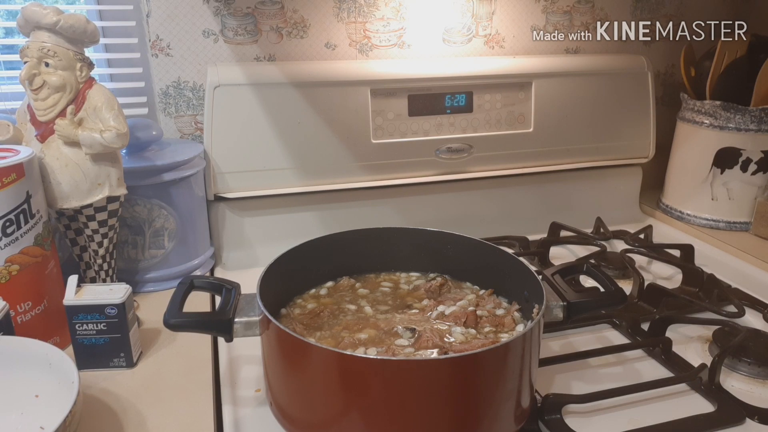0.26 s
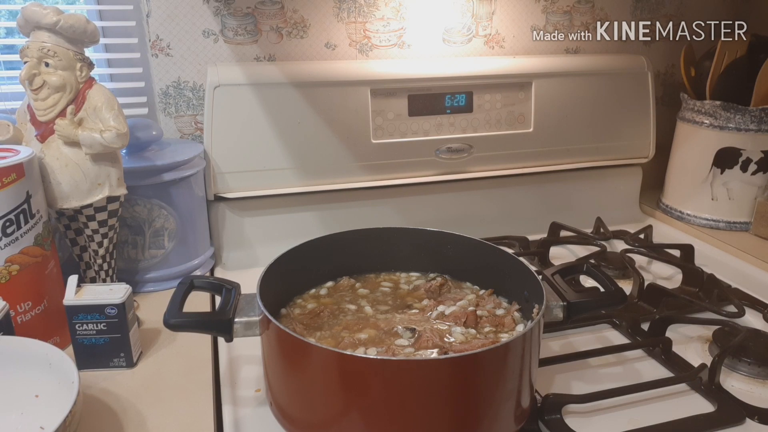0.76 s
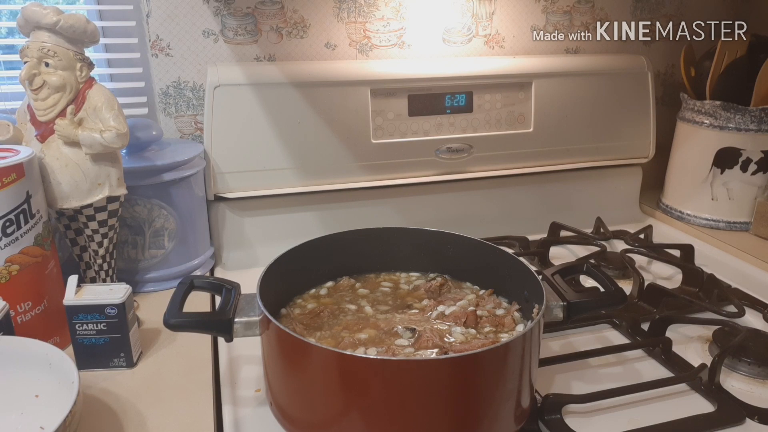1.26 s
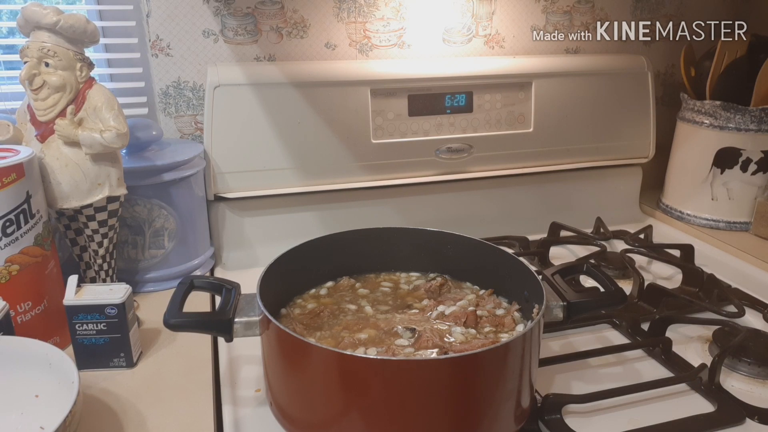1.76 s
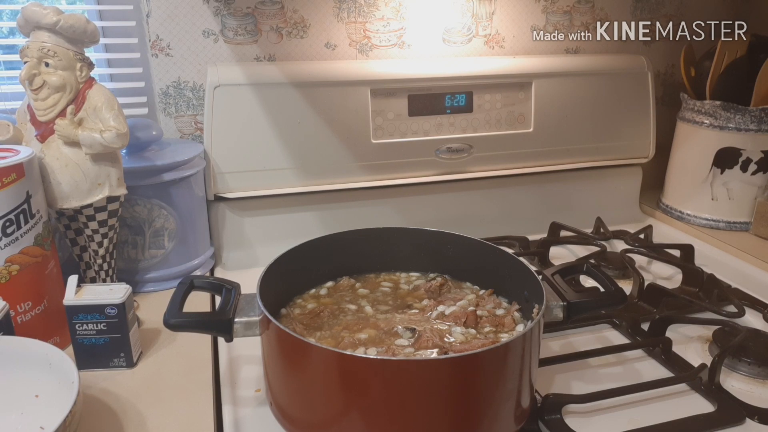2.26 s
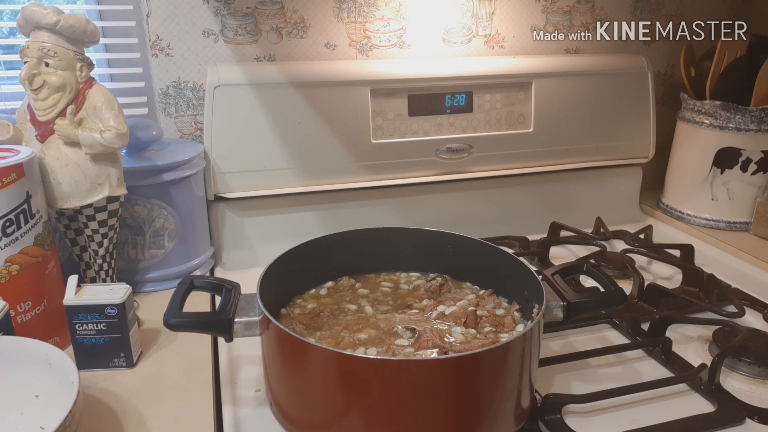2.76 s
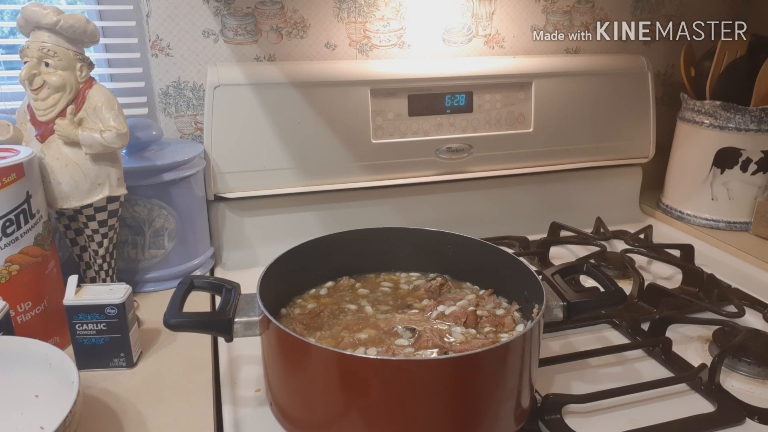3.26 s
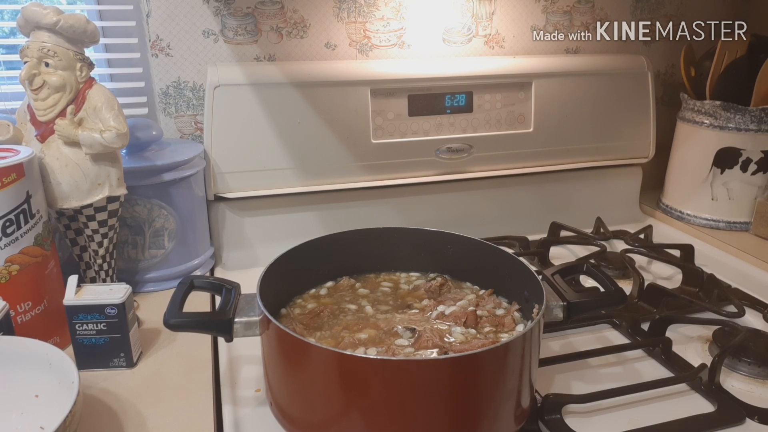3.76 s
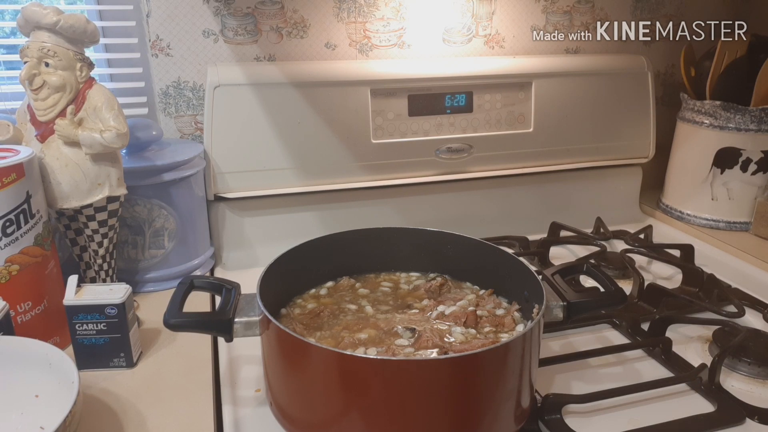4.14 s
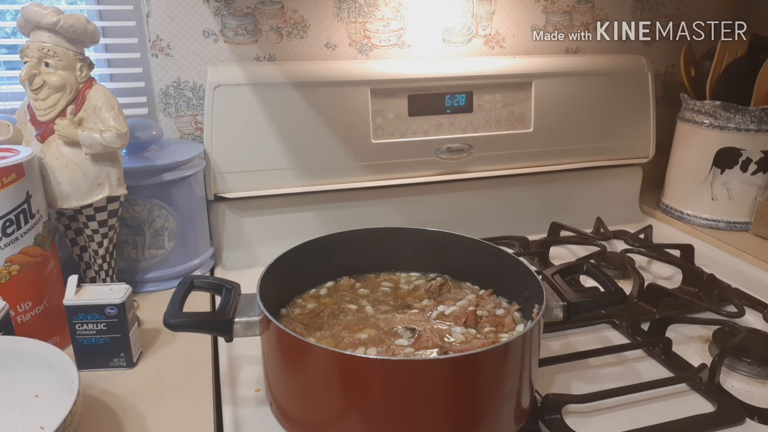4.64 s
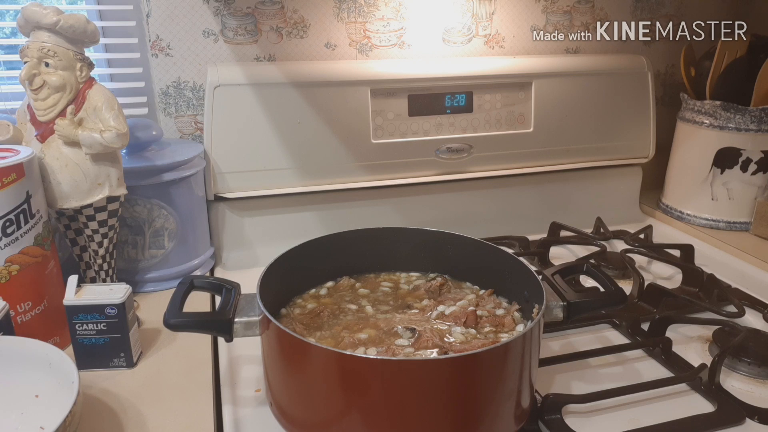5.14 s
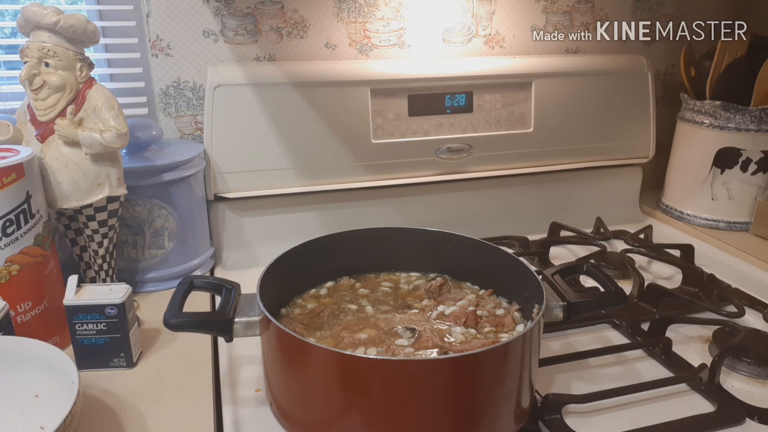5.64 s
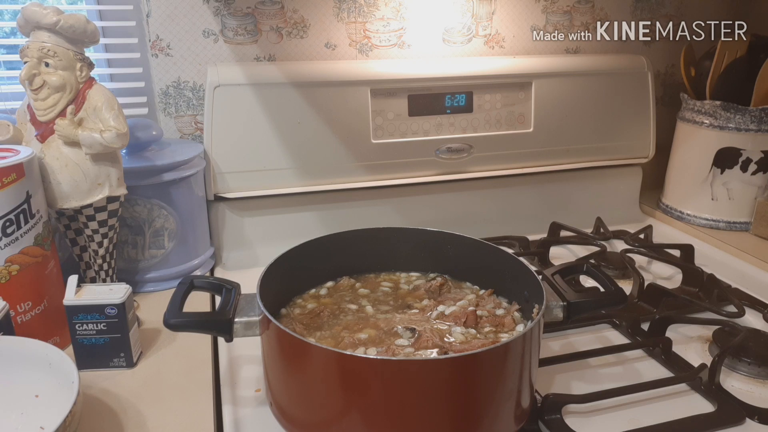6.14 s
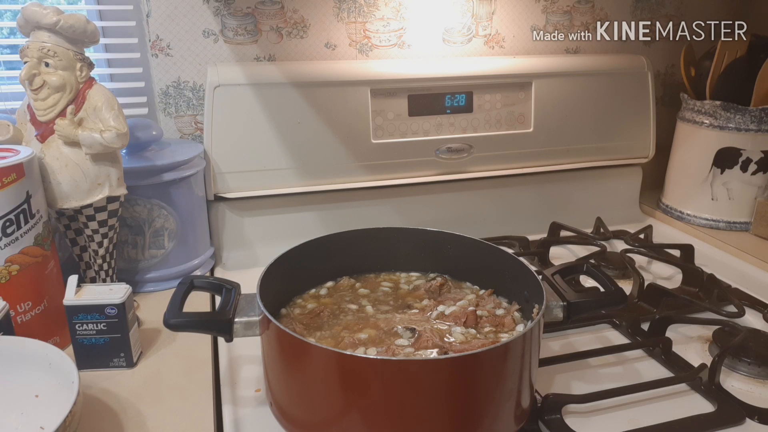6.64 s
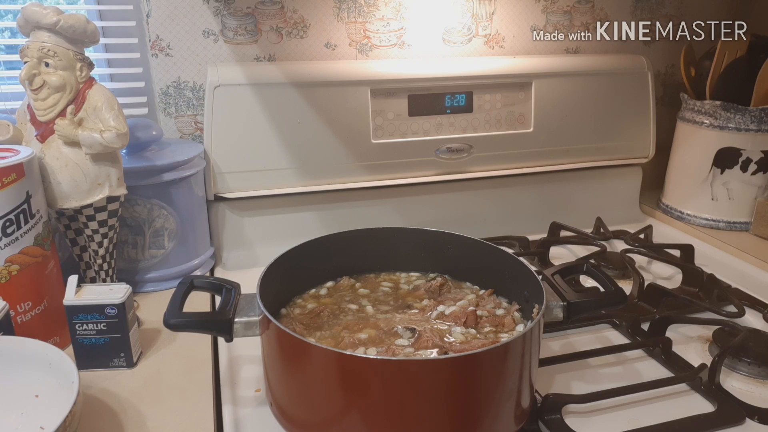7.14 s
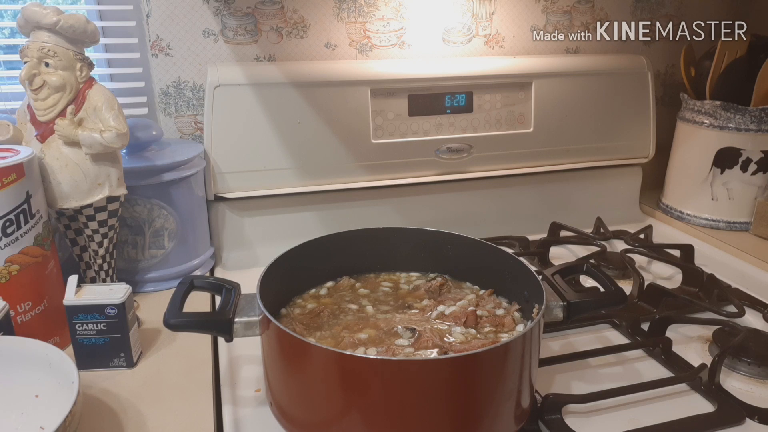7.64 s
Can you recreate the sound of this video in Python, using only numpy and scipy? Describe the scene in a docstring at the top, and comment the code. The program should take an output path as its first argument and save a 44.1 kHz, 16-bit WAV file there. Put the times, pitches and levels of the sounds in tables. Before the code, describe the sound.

A gas burner hisses steadily under a simmering pot while dishes clink lightly and things are set down farther off in a hard-walled kitchen.

```python
"""A hard-walled kitchen: a pot simmers on a gas stove, the burner hissing over the hum of appliances.
Further off someone handles crockery: dishes ring in beating modes, things set down knock the counter.
Slid things drone faintly as narrow-band friction noise; a soft rustle of broad noise comes and goes.
Two microphone ports a hand apart hear the burner and the crockery from the left."""
import sys
import numpy as np
from scipy import signal
from scipy.fft import rfft, irfft, next_fast_len
from scipy.io import wavfile
from scipy.ndimage import uniform_filter1d, map_coordinates

SR = 44100
rng = np.random.default_rng(int(sys.argv[2]) if len(sys.argv) > 2 else 0)


def wav_record(signal):
    """Record a signal, one row per channel, as 16-bit PCM in the file named by sys.argv[1]."""
    frames = np.transpose(np.atleast_2d(signal))
    bounded = np.clip(frames, -1, 1)
    # unit amplitude maps onto the largest positive 16-bit level
    quanta = np.round(bounded * 32767).astype(np.int16)
    wavfile.write(sys.argv[1], SR, quanta)


N = 347720  # length in samples

# Colour of the burner jets. Each row: frequency in Hz, relative density in dB per Hz.
JET_COLOUR = [(1350, -32), (2300, -22), (2970, -10), (3380, -5.5), (3690, -6.5), (3930, -2.5), (4400, -6.5),
              (4770, -3), (7410, -1.5), (8690, -9), (11000, 3.5), (12900, 2.5), (15600, -2.5)]
# Narrow bands that stand out of both hiss and hum. Each row: centre in Hz, width in Hz, lift in dB.
NARROW_BANDS = [(57, 26, 7.5), (100, 10, 2), (275, 14, -1), (510, 64, 6.5), (674, 26, 9.5), (1067, 44, 6.5),
                (1530, 71, 14.5), (2033, 91, 7), (4410, 64, 10), (11600, 350, 0.5)]
# Mode pairs of the dish. Each row: frequency in Hz, level in dB, t60 in s, split of the pair in Hz.
DISH_MODES = [(1858, 0, 0.4, 20), (2915, 7, 0.19, 40), (2815, -5.5, 0.08, 30), (4125, -2.5, 0.1, 40),
              (5560, -3, 0.055, 62)]
# Contacts on the dish. Each row: start in s, level in dB, hardness in dB per octave, lift of the second
# mode in dB, lean to the upper mode of each pair from -1 to 1, time it rings freely until damped in s.
DISH_CLINKS = [(0.6377, -33, 0, -11, 0.56, 0.0081), (0.651, -26.5, -7, -12, 1, 0.031),
               (0.7159, -27, 1.5, -9, 0.23, 0.024), (.733, -44, -3, 4.5, 0.6, .02),
               (0.762, -45.5, 10, -11, 0.88, 0.017), (1.5417, -40, 6.5, 1, -.5, 0.017),
               (1.570, -42, 2, -4, -0.58, 0.048), (4.0277, -33.5, 5.5, -12.5, 0.85, 0.063),
               (4.117, -44.5, -8, -6, 0.89, 0.048), (4.522, -41, 0, 8, -0.034, 0.066),
               (4.685, -47.5, -2, 7.5, 0.53, .025), (4.708, -43, -5, -8, 0.96, 0.045),
               (5.108, -39.5, 9, -12, -0.82, 0.025), (5.131, -52.5, 9, 6.5, 0.45, 0.031),
               (5.177, -39.5, 2, -12, -0.72, 0.039), (5.321, -42.5, 6, 1, 0.79, 0.05),
               (5.393, -45, 0, -12, 0.78, 0.054)]
# A smaller piece with one clear mode pair. Its row: frequency in Hz, level in dB, t60 in s, split in Hz.
CUP_MODES = [(2210, 0, 0.22, 4)]
# Light taps on the cup. Each row: start in s, level in dB, time it rings freely in s.
CUP_CONTACTS = [(.717, -45, .012), (.738, -47, .02), (1.509, -37, 0.039), (1.8994, -41, .035)]
# Things set down. Each row: start in s, level in dB, centre in Hz (higher for harder things),
# width over centre (a ratio).
SET_DOWNS = [(.652, -41.5, 1540, 2.9), (0.718, -36.5, 2600, 2.1), (.721, -48, 700, 2),
             (1.543, -42, 2300, 2.5), (1.551, -37, 3170, 0.38), (2.139, -52, 115, 1.3),
             (2.146, -44.5, 740, 1.6), (4.027, -37, 3800, 2.5), (4.522, -39.5, 2900, 0.65),
             (5.18, -47.5, 2300, 0.71), (5.32, -42.5, 2600, 1.2), (5.5475, -31.5, 2000, 2.4),
             (5.551, -40.5, 570, 0.89)]
# What the knocks ring with. Each row: resonance in Hz, width in Hz, level in dB.
COUNTER_MODES = [(105, 29, 11), (436, 120, 3.5), (653, 85, -1.5), (885, 60, 1), (1110, 70, 0),
                 (1330, 110, 4), (1560, 90, 7.5), (1950, 160, 3), (2370, 92, -7), (3040, 200, -6),
                 (3540, 150, -3), (4460, 300, -6)]
# Decay of the room. Each row: frequency in Hz, t60 in s.
ROOM_DECAY = [(200, 0.3), (2000, 0.34), (8000, 0.06)]
# Level curve of the bright rustle. Each row: time in s, level in dB.
RUSTLE_LEVELS = [(0.0, -44.5), (0.45, -40), (1.03, -39.5), (1.2, -38), (1.34, -41.5), (1.56, -37.5),
                 (2.3, -39), (2.4, -36), (3.18, -44), (3.42, -38), (4.0, -44), (4.05, -39), (4.26, -37.5),
                 (4.63, -42.5), (5.97, -45), (7.88, -45)]
# Colour of the bright rustle. Each row: frequency in Hz, relative density in dB per Hz.
RUSTLE_SPECTRUM = [(700, -36), (1500, -6), (2500, -2), (5000, 2), (8000, 1.5), (12000, -16.5), (15600, -1)]
# Level curve of movement about the room. Each row: time in s, level in dB.
SHUFFLE_LEVELS = [(0.33, -76), (0.68, -57), (1.03, -62.5), (2.02, -51), (2.61, -50.5), (3.09, -50),
                  (3.88, -51), (4.76, -57), (5.24, -58), (6.19, -54), (6.5, -58), (7.88, -56.5)]
# Colour of that movement. Each row: frequency in Hz, relative density in dB per Hz.
SHUFFLE_SPECTRUM = [(150, -23), (300, -16), (600, 0.5), (1000, 3), (1600, 4.5), (2500, 4.5), (4000, -10)]
# Faint drones, as of things slid on a counter. Each row: start in s, length in s, resonance in Hz,
# width in Hz, level in dB.
SLIDE_STROKES = [(0.486, 0.16, 1510, 115, -52.5), (1.404, 0.047, 1300, 100, -55),
                 (1.574, 0.048, 820, 70, -54), (2.868, 0.38, 627, 130, -60.5), (3.55, 0.46, 650, 90, -65),
                 (3.89, 0.21, 529, 70, -62), (4.39, 0.19, 744, 45, -61.5), (5.1, 0.31, 1003, 40, -63),
                 (5.957, 0.44, 512, 30, -62.5), (6.0, 0.36, 630, 160, -64)]
# Colour of the appliances. Each row: frequency in Hz, relative density in dB per Hz.
APPLIANCE_COLOUR = [(15, -49), (25, -27), (43, -15), (74, -13.5), (109, -4), (147, -8), (262, -8.5),
                    (301, -12.5), (508, -14.5), (810, -22), (910, -16.5), (1910, -15.5), (2060, -7.5),
                    (2600, -39), (3380, -31), (5720, -120)]

PORT_GAP_S = 0.0005  # travel time of sound between the ports
CROCKERY_LEAD_S = 0.00045  # the crockery's direct sound reaches the left port this much earlier
TOP_HZ = 15520  # band limit of the recorder
CONTACT_RISE_S = 0.004
DAMPED_T60_S = 0.07  # ring once a hand or the stack holds the piece
RATTLE_DB, RATTLE_PER_S = 1.1, 80  # shake of a mode's level: depth at 2 kHz, knots a second
BLOW_DB = 6  # first impact of a knock over its puff
KNOCK_RISE_S, KNOCK_T60_S = 0.003, 0.06  # rise and decay of the puff
SLIDE_FADE_S = 0.06  # fade in and out, centred on the ends of the stroke
MAINS_HZ, MAINS_DB = 120.4, -66.5  # mains tone and its middle rms level


def burner():
    """Gas jets under the pot: a smooth hiss that wavers slightly, heard straight and off the stove's side."""
    leads_s = [0.00022, 0.00045]  # the two paths
    colour = lambda hz, t: amp(along(JET_COLOUR, hz)) * stands_out(hz)
    jets = rush(colour, direct=0.42, lead_s=leads_s, patchy_db=1.6)
    breathing_db = 0.35 * wobble(4) + 0.35 * wobble(12) + 0.25 * wobble(24)
    return amp(-37.0 + breathing_db) * unit(jets)


def clinks():
    """A harder contact favours the dish's high modes; the cup is tapped lightly."""
    out = np.zeros((2, N))
    mode_hz = np.array(DISH_MODES)[:, 0]
    octaves = np.log2(mode_hz / mode_hz[0])
    second = np.arange(len(DISH_MODES)) == 1
    for start, db, hardness, lift, lean, free_s in DISH_CLINKS:
        lifts_db = db + hardness * octaves + lift * second
        add(out, start, ring(DISH_MODES, lifts_db, lean, free_s))
    for start, db, free_s in CUP_CONTACTS:
        add(out, start, ring(CUP_MODES, [db], 0, free_s))
    return out


def ring(modes, lifts_db, lean, free_s):
    """One contact rings every mode, each a close pair that beats, until the piece is damped."""
    t = np.arange(SR // 3) / SR
    chatter = np.cumsum(rng.normal(0, 0.022, len(t)))  # touching surfaces blur the phase, radians at 2 kHz
    upper = (1 + lean) / 2
    tone = np.zeros(len(t))
    for lift, (hz, db, t60, split) in zip(lifts_db, modes):
        blur = chatter * hz / 2000
        high = np.sin(2 * np.pi * (hz + split / 2) * t + blur)
        low = np.sin(2 * np.pi * (hz - split / 2) * t + blur)
        rattle_db = RATTLE_DB * (hz / 2000) ** 2 * wobble(RATTLE_PER_S, size=len(t))
        level = amp(db + lift - 60 * t / t60 + rattle_db)
        tone += level * (upper * high + (1 - upper) * low)
    rise = 1 - np.exp(-t / CONTACT_RISE_S)
    damping = amp(-60 * np.maximum(t - free_s, 0) / DAMPED_T60_S)
    return in_kitchen(tone * rise * damping, wet_db=-9)


def knocks():
    """A dull blow: one impact and a short puff of broad noise ring the counter, a little more wall than direct."""
    out, t = np.zeros((2, N)), np.arange(SR // 6) / SR
    for start, db, centre, breadth in SET_DOWNS:
        puff = rng.standard_normal(len(t)) * amp(-60 * t / KNOCK_T60_S) * (1 - np.exp(-t / KNOCK_RISE_S))
        puff[0] = amp(BLOW_DB)

        def response(hz):
            colour = np.sqrt(SR / centre / breadth) * resonance(hz, centre, breadth * centre) ** 2
            return colour * counter(hz)
        add(out, start, in_kitchen(amp(db) * filtered(puff, response), wet_db=1))
    return out


def counter(hz):
    """The counter passes a blow on almost whole and adds its own resonances."""
    return 0.96 + sum(amp(db) * resonance(hz, centre, width) for centre, width, db in COUNTER_MODES)


def in_kitchen(hit, wet_db):
    """A far hit: its direct sound from the left and a fresh tail from all walls, wet_db over the direct."""
    hz, t, z = signal.stft(rng.standard_normal((2, SR // 3)), SR, nperseg=256)
    alike = np.sinc(2 * hz * PORT_GAP_S)[:, None]  # coherence of sound from all sides
    z[1] = alike * z[0] + np.sqrt(1 - alike ** 2) * z[1]
    decay = amp(-60 * t / along(ROOM_DECAY, hz)[:, None])
    tail = signal.istft(z * decay, SR, nperseg=256)[1]
    tail = amp(wet_db) * tail / np.linalg.norm(tail[0])
    tail[0, 0] += 1  # direct sound, left port first
    tail[1, round(CROCKERY_LEAD_S * SR)] += 1
    return signal.fftconvolve(hit[None], tail, axes=1)


def rustle():
    """A bright rustle and duller movement about the room, both soft noise heard mostly off the walls."""
    bright = stir(RUSTLE_LEVELS, RUSTLE_SPECTRUM, clump_db=0.4, direct=0.094, lead_s=0.00019)
    dull = stir(SHUFFLE_LEVELS, SHUFFLE_SPECTRUM, clump_db=1.5, direct=0.31, lead_s=0.00014)
    return bright + dull


def stir(levels, colour, clump_db, direct, lead_s):
    """Soft broad noise in uneven clumps, on a level curve."""
    s, db = np.transpose(levels)
    noise = rush(lambda hz, t: amp(along(colour, hz)), direct, lead_s, patchy_db=2.2)
    level_db = np.interp(np.arange(N) / SR, s, db) + clump_db * wobble(18)
    return amp(level_db) * unit(noise)


def slides():
    """Friction noise held in one narrow resonance for the length of each stroke."""
    def gain(hz, t):
        total = 0
        for start, length, centre, width, db in SLIDE_STROKES:
            to_edge = np.minimum(t - start, start + length - t)
            stroke = np.clip(to_edge / SLIDE_FADE_S + 0.5, 0, 1)
            peak = np.sqrt(SR / width) / (1 + (2 * (hz - centre) / width) ** 2)
            total = total + amp(db) * stroke * peak
        return total
    return rush(gain, direct=0.18, lead_s=0.0001, patchy_db=1.5, size=2048)


def appliances():
    """Motors and air fill the room with a low hum around one mains tone that wavers in level."""
    colour = lambda hz, t: amp(along(APPLIANCE_COLOUR, hz)) * stands_out(hz)
    hum = rush(colour, direct=0.24, lead_s=0.00048, patchy_db=2.5, size=8192)
    sine = unit(np.sin(2 * np.pi * MAINS_HZ * np.arange(N) / SR))
    tone = amp(MAINS_DB + 1.6 * wobble(7)) * sine
    return amp(-54.0 + 1.85 * wobble(2.94)) * unit(hum) + tone


def stands_out(hz):
    """Gain of the narrow bands, each a rounded peak in dB."""
    return amp(sum(db / (1 + ((hz - c) / (w / 2)) ** 2) for c, w, db in NARROW_BANDS))


def rush(gain, direct, lead_s, patchy_db, size=1024):
    """Stereo noise with gain(Hz, s): a direct share reaches the left port first, the rest is from all walls."""
    hz, t, z = signal.stft(rng.standard_normal((2, N)), SR, nperseg=size)
    field = rng.standard_normal(z.shape[1:])  # smoothed into patches over frequency and time
    field = uniform_filter1d(uniform_filter1d(field, size=5, axis=0), size=5, axis=1)
    hz = hz[:, None]
    delayed = np.exp(-2j * np.pi * hz * lead_s).mean(axis=1, keepdims=True)  # mean over the paths
    from_walls = np.sinc(2 * hz * PORT_GAP_S)
    alike = direct * delayed + (1 - direct) * from_walls
    alike = 0.95 * alike  # turbulence at each port is its own
    z[1] = alike * z[0] + np.sqrt(np.abs(1 - np.abs(alike) ** 2)) * z[1]
    shaped = z * gain(hz, t) * amp(patchy_db * unit(field))
    return signal.istft(shaped, SR, nperseg=size)[1][:, :N]


def resonance(f, c, w):
    """A causal resonance at c Hz, w Hz wide."""
    return 1j * f * w / (c * c - f * f + 1j * f * w)


def filtered(x, response):
    """x times a response of frequency."""
    m = next_fast_len(x.shape[-1] + 8192)
    spectrum = rfft(x, m) * response(np.fft.rfftfreq(m, 1 / SR))
    return irfft(spectrum, m)[..., :x.shape[-1]]


def wobble(rate, size=N):
    """A smooth random curve, rate knots a second."""
    knots = rng.standard_normal(int(size * rate / SR) + 4)
    return map_coordinates(knots, [np.arange(size) * rate / SR])


def along(points, hz):
    """(Hz, value) points read on a log frequency axis."""
    f, v = np.transpose(points)
    return np.interp(np.log(hz + 1), np.log(f + 1), v)


def amp(db):
    """Gain of a dB value."""
    return 10 ** (np.asarray(db) / 20)


def unit(x):
    """x at rms 1."""
    return x / np.sqrt(np.mean(x ** 2) + 1e-20)


def add(out, s, sound):
    """Mix a sound in at time s, cut at the end of out."""
    part = out[:, round(s * SR):][:, :sound.shape[1]]
    part += sound[:, :part.shape[1]]


def scene():
    """All sources at the two ports; the left port is a little more sensitive."""
    total = burner() + clinks() + knocks() + rustle() + slides() + appliances()
    return total * amp([[0.4], [-0.4]])


def record(dry):
    """The recorder keeps nothing above its band limit."""
    return filtered(dry, lambda hz: hz < TOP_HZ)


dry = scene()
out = record(dry)
wav_record(out)
```